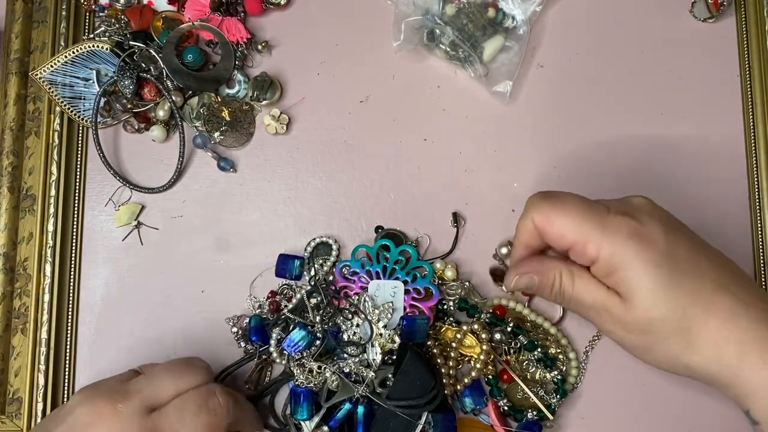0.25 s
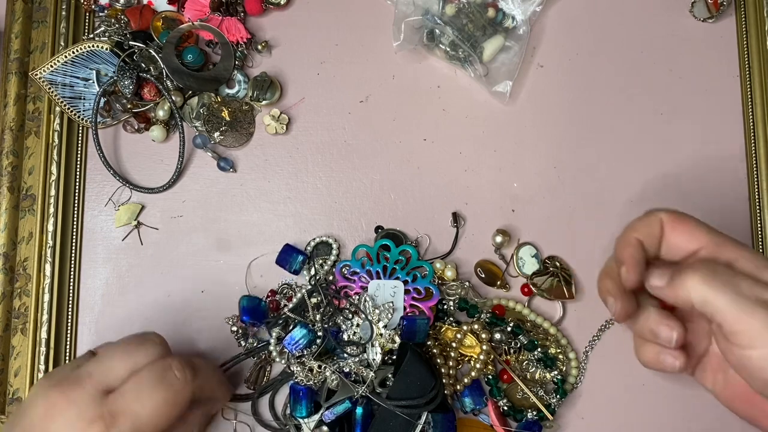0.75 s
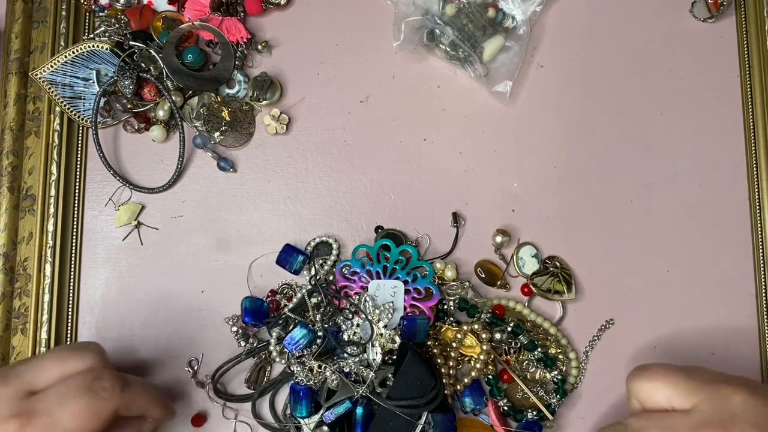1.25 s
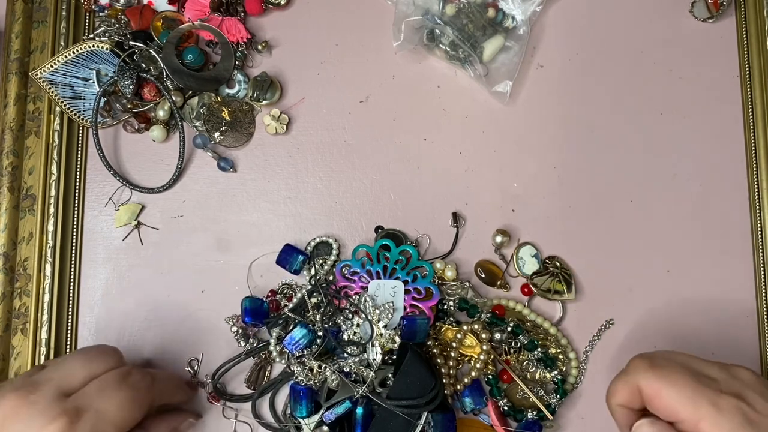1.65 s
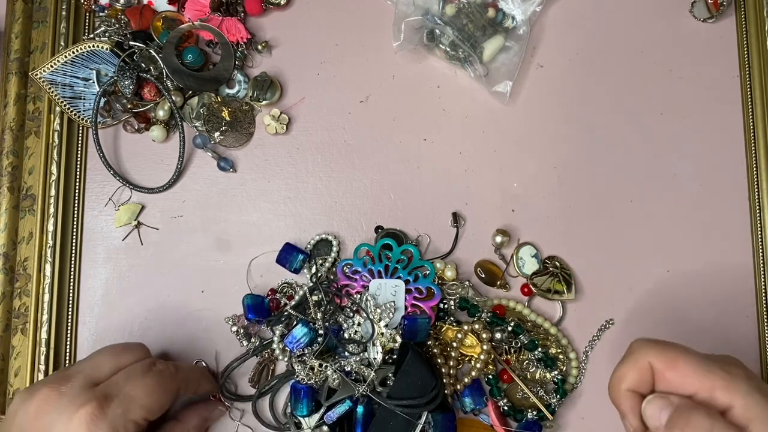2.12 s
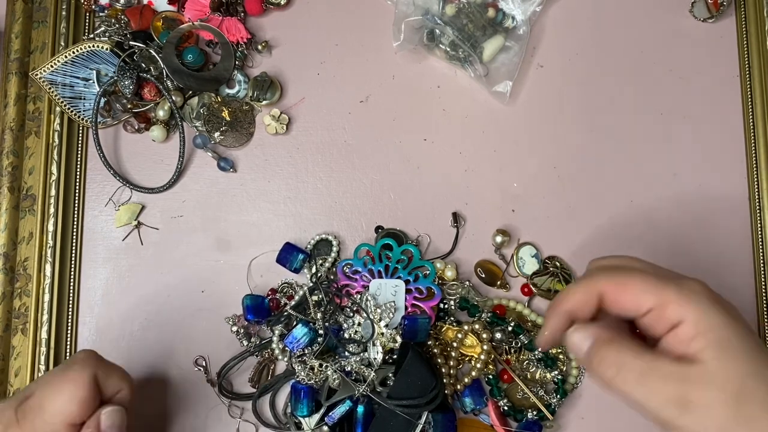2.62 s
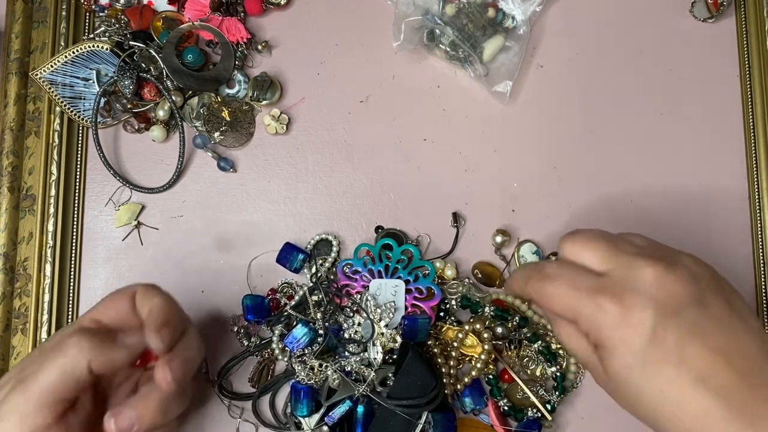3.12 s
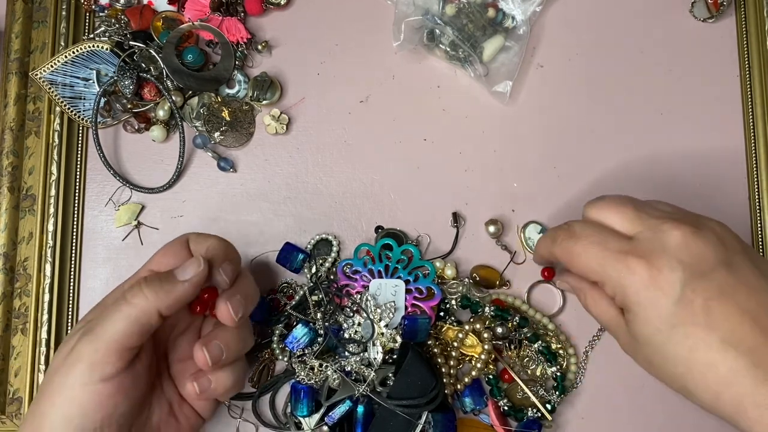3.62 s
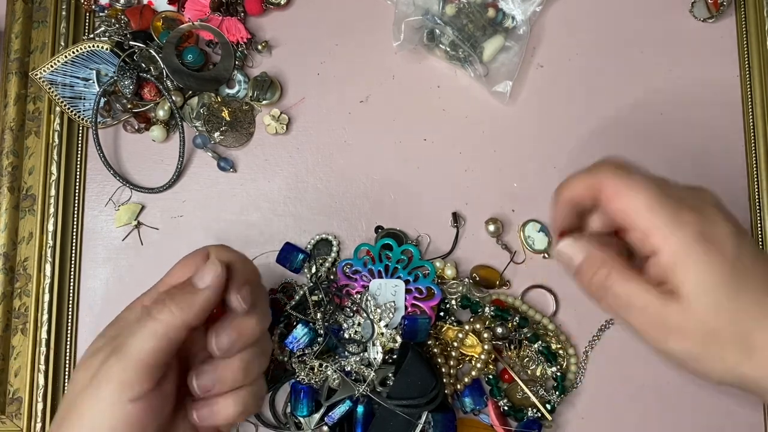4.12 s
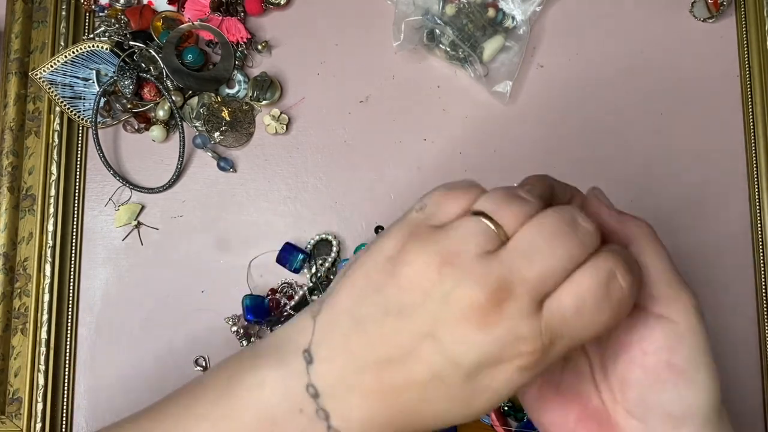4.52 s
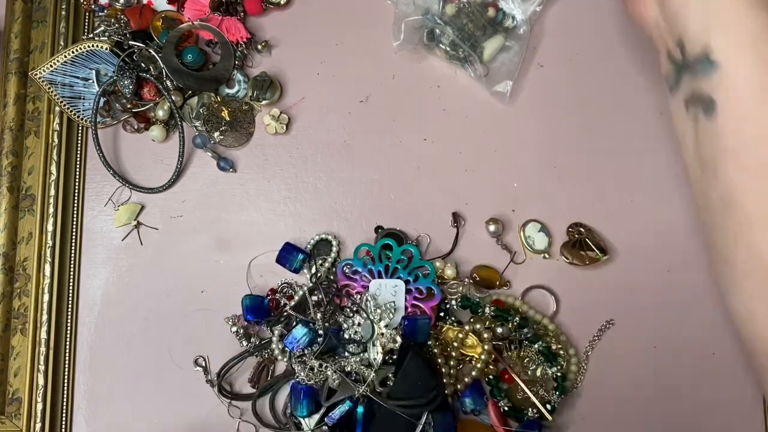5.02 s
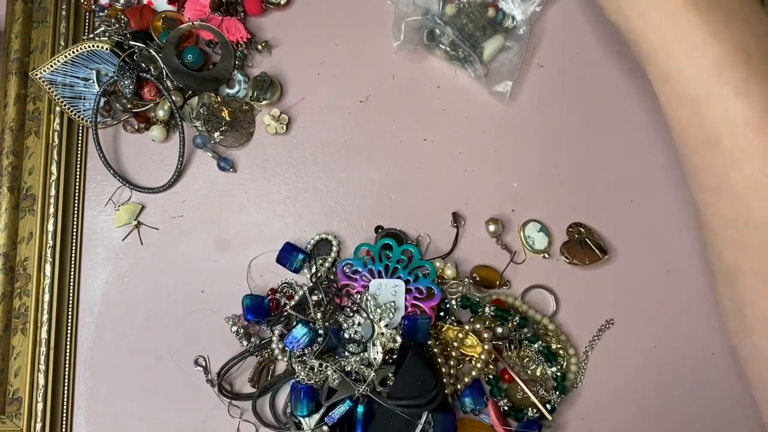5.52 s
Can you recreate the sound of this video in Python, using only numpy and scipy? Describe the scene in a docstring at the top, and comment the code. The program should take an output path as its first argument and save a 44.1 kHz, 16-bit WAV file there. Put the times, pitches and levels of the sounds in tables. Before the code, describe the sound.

Hands sort metal jewellery and beads on a board in a small room, heard close over a faint low hush. From about 0.2 to 0.4 seconds comes a cluster of sharp clinks, a chain rattle and a soft thump. Another short jingle follows at 0.65, and a piece rocks quickly to rest. From 1 to 2.4 seconds there is only a soft bump and faint ticks. A click at 2.5 leads to knocks and brief chain drags around 2.8 and 3.2, then a tiny high ping at 3.5. From 4.1 to 4.9 seconds, beads and links click and roll in a palm while moving arms set off a low table rumble that lasts to the end. At about 5.25 a pendant rings brightly as pieces are swept aside, and the fullest clatter follows, with knocks and soft thumps until 5.7.

```python
"""Faint room air and a low table rumble, then metal jewellery and beads knocking on a framed board.
Two hands sort the heap in a small room. Each touch is a crack and a short ring; dragged chains
make a hail of tiny touches. A piece rocks to rest, a loose charm pings, beads click and roll in
the palm, and a pendant rings as it is swept aside. The moving arms make the table boom."""
import sys
import numpy as np
from scipy import signal
from scipy.fft import rfft, irfft
from scipy.io import wavfile
from scipy.ndimage import uniform_filter1d

SR = 44100
rng = np.random.default_rng(int(sys.argv[2]) if len(sys.argv) > 2 else 0)


def to_wav(s):
    """Save 16-bit WAV."""
    ch = np.atleast_2d(s).T  # columns
    pcm = np.round(np.clip(ch, -1, 1) * 32767)  # PCM
    wavfile.write(sys.argv[1], SR, pcm.astype(np.int16))


N = 253559
TIME_S = np.arange(N) / SR

# Room air spectrum. Each row: frequency in Hz, relative density in dB.
AIR_SPECTRUM = [(20, -7.5), (35, -13.5), (84, -2.5), (137, -4), (185, -20.5), (450, -19), (641, -25),
                (1160, -31.5), (2500, -38.5), (9000, -43.5), (16000, -49.5)]
# Arms shifting on the table. Each row: time in seconds, strength in dB.
ARM_MOTION = [(0.0, -69), (0.24, -82), (0.32, -50), (0.37, -64), (4.08, -55), (4.19, -45.5), (4.24, -47),
              (4.61, -48.5), (4.68, -57), (4.96, -46.5), (5.72, -50), (5.75, -65)]
# Spectrum of soft table bumps. Each row: frequency in Hz, relative density in dB.
BUMP_SPECTRUM = [(40, -14), (75, 3), (130, 0.5), (185, -13), (260, -18.5), (390, -16.5), (600, -34),
                 (1200, -46.5), (8000, -83)]
# A hand or heavy piece lands on the table. Each row: time in seconds, level in dB.
THUMPS = [(0.29, -51), (1.222, -55), (2.748, -52), (3.19, -54), (4.179, -60.5), (5.31, -53.5),
          (5.55, -51.5)]

# Ringing parts: board, large pieces, thin plates, beads, fine links. Each row: lowest and highest
# frequency in Hz, T60 in seconds, crack decay in seconds, touches per second when dragged.
PARTS = [(291.8, 620, 0.045, 0.0089, 250), (678.8, 1200, .042, 0.0027, 400),
         (1278, 2600, .045, 0.0017, 450), (2717, 8700, 0.067, .002, 450), (8640, 13930, 0.059, 0.0016, 350)]
BEADS, LINKS = 3, 4
# Path from each part to the microphones. Each row: left phase lead in radians, uncorrelated
# side signal as a ratio, left over right in dB, room send in dB.
MIC_PATHS = [(-0.76, 0.16, 0.5, -15.5), (1, 0.3, 3.5, -17), (.9, 0.33, 2.5, -13), (1, 0.45, 2.5, -15.5),
             (0, .6, 0, -18.5)]
# Each part's share of a touch. Each row: offset in dB, dB per dB of brightness, change when
# pinned in dB, change when swept in dB.
PART_SHARES = [(-10.5, -0.62, 9.5, 1.5), (-0.5, -0.5161, -3, -4), (-3, -0.3463, -10.5, 4),
               (0.5, 0.3046, -2.5, -2), (1, 0.4912, 2, 1.5)]
PINNED_FROM_S, PINNED_TO_S, SWEPT_FROM_S = 1.95, 3.7, 5.2
# Board resonances. Each row: frequency in Hz, width in Hz, lift in dB.
BOARD_RESONANCES = [(205, 20, 18), (374.4, 24, 10), (510, 41, -5), (721.6, 91, 7), (940, 23, 3.5),
                    (1330, 120, 8), (1546, 70, 9), (6000, 1400, 2)]
# Knocks on the board or heap. Each row: time in seconds, strength in dB, brightness
# (fine links over large pieces) in dB.
KNOCKS = [(0.1698, -42.5, -7), (0.234, -40.5, -2), (0.264, -42, -31), (0.2795, -39, 16),
          (0.2874, -32.5, -11), (0.338, -37, -8.5), (0.65, -39, -10.5), (0.6537, -37, 14.5),
          (0.669, -42, -2), (0.8069, -46, 27), (1.724, -69.5, 5), (1.792, -62.5, 1.5), (2.0578, -63.5, 1),
          (2.7251, -52, 11), (2.7802, -44, 8.5), (3.088, -52, 4.5), (3.1202, -40, 4.5), (3.197, -37.5, -8),
          (3.374, -55, -13), (3.8565, -62, -13), (3.8846, -61, -17), (5.212, -66, 51),
          (5.2518, -44.5, 37.5), (5.267, -55, -4), (5.286, -35, 14.5), (5.308, -35, 4),
          (5.325, -37.5, 20.5), (5.4165, -31.5, -3.5), (5.544, -30, 0.5), (5.594, -51.5, -14),
          (5.6932, -53, 1.5), (5.7306, -40.5, -2.5)]
# Dragging strokes. Each row: start and end in seconds, strength in dB, brightness in dB.
DRAGS = [(0.175, 0.24, -67, -11), (0.28, 0.382, -50, -6.5), (0.614, 0.659, -67.5, 4), (0.65, 0.732, -43, 1),
         (0.722, 0.903, -60.5, -11), (1.572, 1.598, -74, -14), (1.721, 1.808, -80.5, 10),
         (1.999, 2.17, -77.5, 0), (2.179, 2.236, -63.5, -4), (2.727, 2.742, -47, 13.5),
         (2.741, 2.825, -58, 3), (3.103, 3.233, -50, -9), (3.337, 3.389, -56.5, -2.5),
         (3.489, 3.612, -62.5, -20), (3.857, 3.94, -70.5, -9), (5.219, 5.24, -49, 3),
         (5.261, 5.323, -43, -11), (5.317, 5.447, -47.5, 9), (5.457, 5.649, -54.5, 2.5)]
# Clicks clear of the board. Each row: time in seconds, strength in dB.
CLICKS = [(0.2749, -26), (0.4779, -54.5), (1.213, -61.5), (2.4813, -38), (2.585, -52.5), (2.849, -46.5),
          (3.255, -47), (3.932, -56.5), (4.1218, -49), (4.2404, -57), (4.3418, -50.5), (4.379, -37),
          (4.4227, -47), (4.4728, -51), (4.485, -47.5), (4.5228, -48), (4.5559, -33), (4.567, -35),
          (4.584, -41.5), (4.609, -44.5), (4.6224, -36.5), (4.635, -42.5), (4.7111, -39.5), (4.7414, -47.5),
          (4.837, -39), (4.8576, -37.5), (4.9181, -42.5), (5.093, -53.5), (5.169, -52.5), (5.374, -37),
          (5.541, -33), (5.726, -41.5)]
# Resonances of hard beads in the palm. Each row: frequency in Hz, width in Hz, lift in dB.
PALM_RESONANCES = [(3550, 700, 6), (14600, 1600, 9.5)]
# Pings of a loose charm. Each row: time in seconds, frequency in Hz, level in dB, T60 in seconds.
CHARM_PINGS = [(2.7815, 5500, -49, 0.073), (3.4951, 8600, -38, 0.031), (3.4946, 9360, -48.5, 0.029)]
# Beads rolling in the palm. Each row: start and end in seconds, strength in dB.
PALM_ROLLS = [(4.408, 4.522, -63.5), (4.551, 4.648, -54), (4.827, 4.91, -62.5)]
# Pendant modes. Each row: frequency in Hz, level in dB, T60 in seconds.
PENDANT_MODES = [(1460, -36, 0.1), (1994, -34, 0.11), (2772, -48, 0.16), (3730, -41.5, 0.089),
                 (5060, -50, 0.11), (6184, -34.5, 0.058), (9120, -31.5, 0.055), (14805, -32.5, .09)]

# Microphone treble dips. Each row: frequency in Hz, width in Hz, gain in dB.
MIC_DIPS = [(8350, 2000, -6), (12390, 4400, -17.5)]
# Left microphone port resonances. Each row: frequency in Hz, width in Hz.
LEFT_PORT_RESONANCES = [(8300, 1200), (11900, 1500), (15500, 1200)]


def from_db(db):
    return 10 ** (np.asarray(db) / 20)


def add(track, start_s, sound):
    """Mix a stereo sound into the track."""
    start = int(np.clip(round(start_s * SR), 0, N - 1))
    track[:, start:start + sound.shape[1]] += sound[:, :N - start]


def convolve(x, response):
    return signal.oaconvolve(np.atleast_2d(x), response, axes=1)[:, :N]


def levelled(x, span_s):
    """Hold RMS near 1 over each span; faster detail stays."""
    power = uniform_filter1d(np.mean(x ** 2, axis=0), max(int(span_s * SR), 1))
    return x / np.sqrt(np.maximum(power, 0) + 1e-3 * power.mean())


def resonance(x, hz, width_hz, lift_db):
    """Lift or cut one band."""
    b, a = signal.iirpeak(hz, hz / width_hz, fs=SR)
    return x + (from_db(lift_db) - 1) * signal.lfilter(b, a, x)


def stroke(start_s, end_s, rise_s, fall_s):
    """Envelope of a hand stroke: quick grip, hold, slower settling."""
    fade = np.maximum(start_s - TIME_S, 0) / rise_s + np.maximum(TIME_S - end_s, 0) / fall_s
    return np.exp(-np.minimum(fade, 20))


def noise(spectrum, mono_below_hz):
    """Stereo noise from (Hz, dB) points, near mono in the bass; RMS 1."""
    hz = np.maximum(np.fft.rfftfreq(N, 1 / SR), 1)
    points_hz, points_db = np.transpose(spectrum)
    gain = from_db(np.interp(np.log(hz), np.log(points_hz), points_db))
    mid, side = rfft(rng.standard_normal((2, N)))
    side = side * hz / (hz + mono_below_hz)
    shaped = irfft(gain * np.array([mid + side, mid - side]), N)
    return shaped / np.sqrt(np.mean(shaped ** 2) + 1e-20)


def room_air(level_db=-68):
    """Steady, bass-heavy hush."""
    return from_db(level_db) * noise(AIR_SPECTRUM, mono_below_hz=2700)


def table_rumble(boom_gain_db=-1.5, bump_gain_db=-9.5):
    """Arms shift on the table: its lowest mode booms under soft bumps and a few thumps."""
    arms_db = np.interp(TIME_S, *np.transpose(ARM_MOTION))
    thumps = sum(from_db(db) * stroke(s, s, rise_s=0.015, fall_s=0.04) for s, db in THUMPS)
    push_spectrum = [(15, -28.5), (33, 0), (55, 6.5), (90, -10.5), (200, -40.5), (2000, -91.0)]
    push = noise(push_spectrum, mono_below_hz=890)
    boom = levelled(resonance(push, hz=47, width_hz=11, lift_db=20.5), span_s=0.26)
    bumps = levelled(noise(BUMP_SPECTRUM, mono_below_hz=560), span_s=0.17)
    return from_db(arms_db + boom_gain_db) * boom + (from_db(arms_db + bump_gain_db) + thumps) * bumps


def contact(part, crack_db=8.0, body=BOARD_RESONANCES):
    """One touch: a crack, then dense modes dying together; RMS 1 over the first 7 ms."""
    low_hz, high_hz, t60_s, crack_s, _ = PARTS[part]
    lead_rad, side_ratio, pan_db, _ = MIC_PATHS[part]
    t = np.arange(SR // 10) / SR
    sides = np.array([[1], [-1]])
    mid, side = signal.hilbert(rng.standard_normal((2, len(t))))
    ring = np.real((mid + sides * side_ratio * side) * np.exp(.5j * sides * lead_rad))
    ring *= from_db(sides * pan_db / 2)
    ring *= from_db(-60 * t / t60_s) * (1 + from_db(crack_db) * np.exp(-t / crack_s))
    ring = signal.sosfilt(signal.butter(2, [low_hz, high_hz], "band", fs=SR, output="sos"), ring)
    own_modes = [(hz, hz / 50, 6.5) for hz in rng.uniform(low_hz, high_hz, size=3)]
    for hz, width_hz, lift_db in own_modes + body:
        ring = resonance(ring, hz, width_hz, lift_db)
    return ring / np.sqrt(np.mean(ring[:, :SR * 7 // 1000] ** 2))


def strikes(part, touches, crack_db, body):
    """Single contacts of one part from (seconds, dB) rows."""
    out = np.zeros((2, N))
    for start_s, level_db in touches:
        add(out, start_s, from_db(level_db) * contact(part, crack_db, body))
    return out


def part_db(part, time_s, strength_db, bright_db):
    """Bright touches favour the small parts, pinned ones the board, swept ones the plates."""
    offset_db, slope, pinned_db, swept_db = PART_SHARES[part]
    pinned = PINNED_FROM_S < time_s < PINNED_TO_S
    swept = time_s > SWEPT_FROM_S
    return strength_db + offset_db + slope * bright_db + pinned_db * pinned + swept_db * swept


def knocks(part, flat_after_s=.003, loss_db=4, dull_db=5.5):
    """Pieces land on an edge, then fall flat, weaker and duller; one rocks to rest."""
    flats = [(s + flat_after_s, db - loss_db, bright_db - dull_db) for s, db, bright_db in KNOCKS]
    landings = KNOCKS + flats + rocking_taps()
    touches = [(s, part_db(part, s, db, bright_db)) for s, db, bright_db in landings]
    return strikes(part, touches, crack_db=6.5, body=BOARD_RESONANCES)


def room(x, t60_s=0.29, onset_s=0.003):
    """Diffuse reflections, uncorrelated left and right."""
    t = np.arange(SR // 2) / SR
    tail = rng.standard_normal((2, len(t))) * from_db(-60 * t / t60_s)
    tail *= 1 - np.exp(-(t / onset_s) ** 2)
    return convolve(x, tail / np.sqrt(np.sum(tail ** 2) / 2))


def dragging(part, strokes, spread_db=4.5, pieces=10):
    """Each stroke draws a hail of tiny uneven touches from several pieces."""
    touches = rng.random(N) < PARTS[part][-1] / SR
    sizes = from_db(spread_db * np.minimum(rng.exponential(1, N), 4)) * rng.choice([-1, 1], N)
    piece_hit = rng.integers(0, pieces, N)
    hail = sum(convolve(touches * sizes * (piece_hit == k), contact(part)) for k in range(pieces))
    push = sum(from_db(db) * stroke(start_s, end_s, rise_s=0.0013, fall_s=0.012)
               for start_s, end_s, db in strokes)
    return push * levelled(hail, span_s=.035)


def palm_clicks(part, gain_db=1.5, beads_db=-19.5, room_db=-15.5):
    """Beads or links click together; the hands shield them from the room."""
    gain = from_db(gain_db + beads_db * (part == BEADS))
    clicks = gain * strikes(part, CLICKS, crack_db=3.5, body=PALM_RESONANCES)
    return clicks + from_db(room_db) * room(clicks)


def rocking_taps(start_s=0.8275, strength_db=-52, bright_db=-12.5, loss_db=3, count=8):
    """Knock rows of a piece rocking to rest, each tap sooner and weaker."""
    gaps_s = .021 * .78 ** np.arange(count)
    return [(start_s + gaps_s[:k].sum(), strength_db - loss_db * k, bright_db) for k in range(count)]


def ringing_metal(pings):
    """Charm or pendant modes ring freely: one decaying sine per (seconds, Hz, dB, T60) row."""
    out = np.zeros((2, N))
    t = np.arange(SR // 3) / SR
    for start_s, hz, level_db, t60_s in pings:
        phase_rad = rng.normal(0, 1.0, (2, 1))
        add(out, start_s, from_db(level_db - 60 * t / t60_s) * np.sin(2 * np.pi * hz * t + phase_rad))
    return out


def palm_rolls(part, beads_db=-8.5):
    """Stroke rows of handfuls rolling in the palm, beads weaker than links."""
    return [(start_s, end_s, db + beads_db * (part == BEADS)) for start_s, end_s, db in PALM_ROLLS]


def pendant(start_s=5.245, end_s=5.335, first_db=1.0, loss_db=1.9):
    """Each knock during the sweep rings the pendant's modes anew, weaker each time."""
    jostles_s = [s for s, *_ in KNOCKS if start_s < s < end_s]
    return ringing_metal([(s, hz, db + first_db - loss_db * k, t60_s)
                          for k, s in enumerate(jostles_s) for hz, db, t60_s in PENDANT_MODES])


def jewellery(knock_gain_db=-3.5, drag_gain_db=-4.0):
    """Knocks, drags, clicks and rolls of the five parts, with their reflections."""
    out = np.zeros((2, N))
    for part in range(len(PARTS)):
        strokes = [(start_s, end_s, part_db(part, start_s, db, bright_db))
                   for start_s, end_s, db, bright_db in DRAGS]
        if part in (BEADS, LINKS):
            out += palm_clicks(part)
            strokes += palm_rolls(part)
        direct = from_db(knock_gain_db) * knocks(part)
        direct += from_db(drag_gain_db) * dragging(part, strokes)
        out += direct + from_db(MIC_PATHS[part][-1]) * room(direct)
    return out


def scene():
    """Jewellery and table over quiet room air."""
    ringing = pendant() + ringing_metal(CHARM_PINGS)
    pieces = jewellery() + ringing + from_db(-11) * room(ringing)
    return pieces + table_rumble() + room_air()


def record(dry, cutoff_hz=16100):
    """Microphones: two treble dips, phase turns in the left port, steep low-pass."""
    for hz, width_hz, gain_db in MIC_DIPS:
        dry = resonance(dry, hz, width_hz, gain_db)
    left, right = dry
    for hz, width_hz in LEFT_PORT_RESONANCES:
        left = left - 2 * signal.lfilter(*signal.iirpeak(hz, hz / width_hz, fs=SR), left)  # all-pass
    return signal.sosfilt(signal.ellip(8, .3, 70, cutoff_hz, fs=SR, output="sos"), [left, right])


dry = scene()
out = record(dry)
to_wav(out)
```